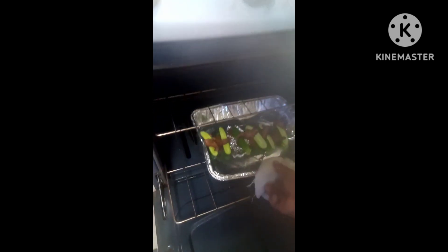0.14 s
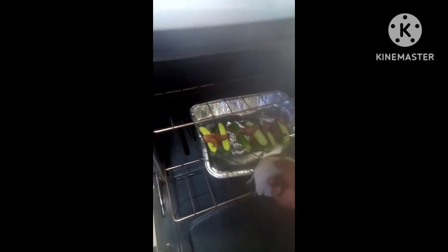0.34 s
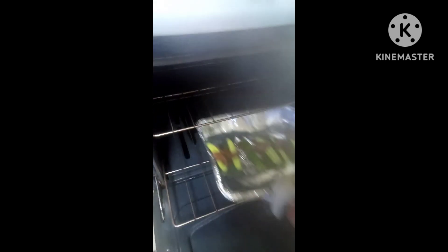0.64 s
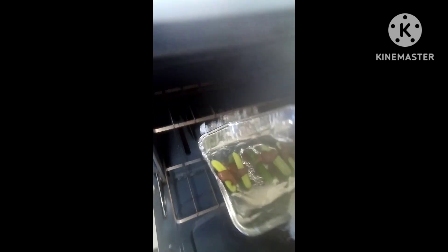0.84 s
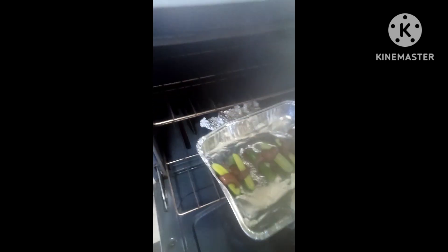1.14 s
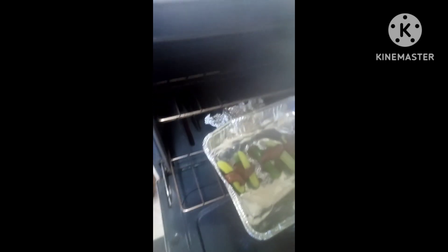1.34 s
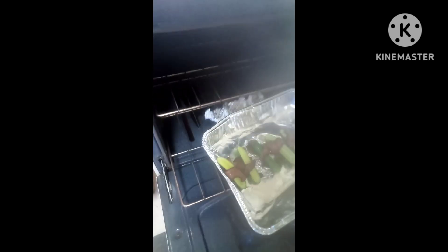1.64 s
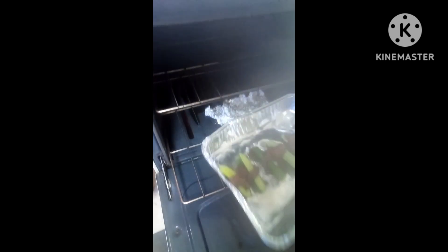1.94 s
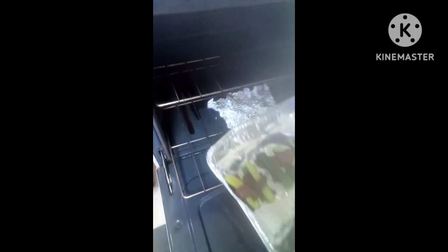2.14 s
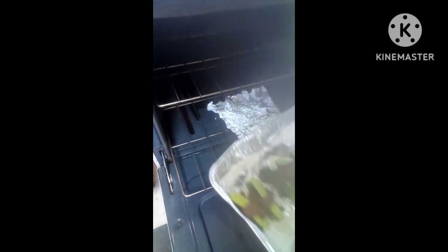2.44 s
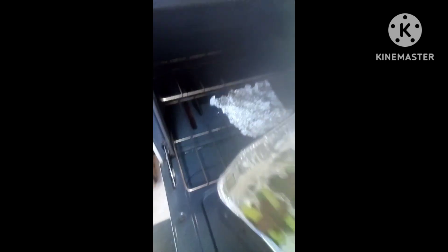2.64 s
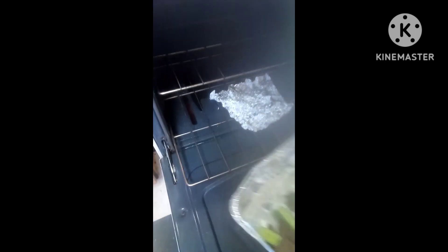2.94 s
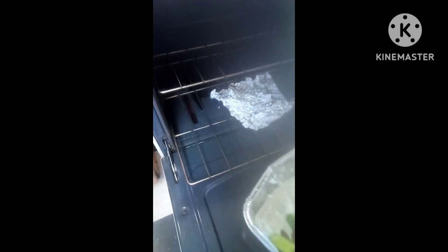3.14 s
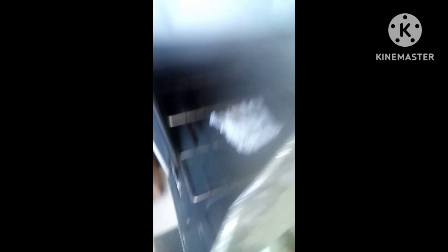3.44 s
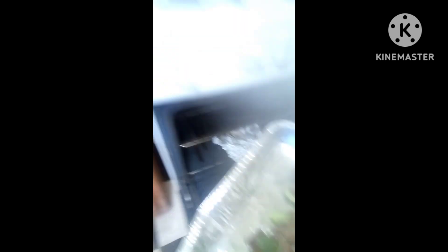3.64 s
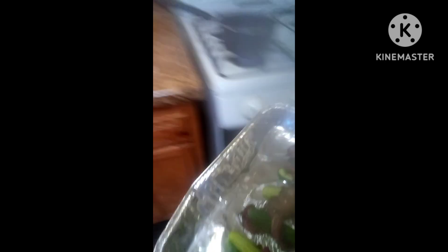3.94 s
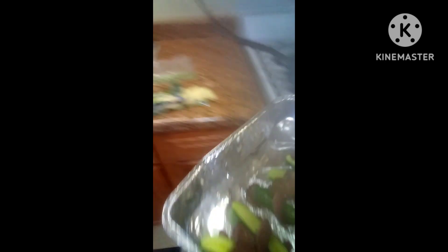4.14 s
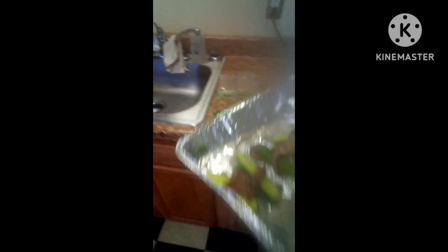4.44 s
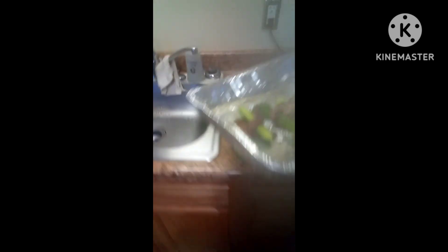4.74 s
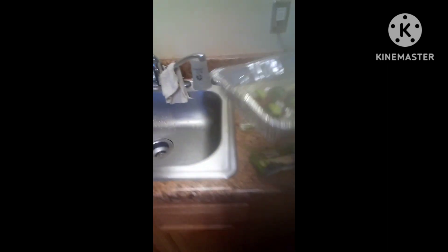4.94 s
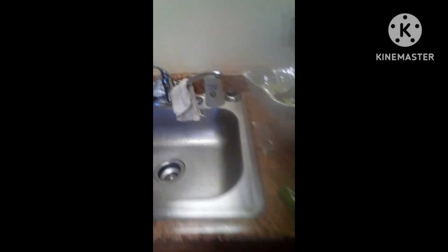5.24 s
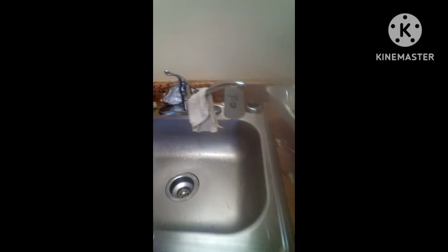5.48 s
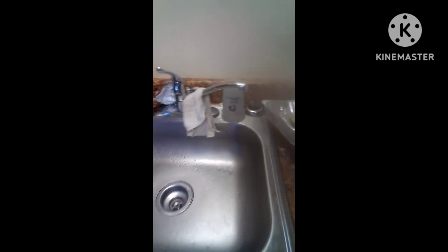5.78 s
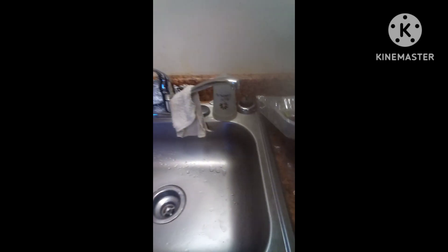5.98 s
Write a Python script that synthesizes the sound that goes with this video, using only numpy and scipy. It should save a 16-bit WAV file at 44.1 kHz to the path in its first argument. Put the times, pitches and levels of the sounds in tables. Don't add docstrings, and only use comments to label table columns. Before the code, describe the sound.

Crinkly aluminium pan dragged and lifted off a wire oven rack, popping and clanking, followed by fridge hum and a single set-down clack.

```python
import sys
import numpy as np
from scipy import signal
from scipy.fft import rfft, irfft
from scipy.io import wavfile
from scipy.ndimage import uniform_filter1d

SR = 44100
rng = np.random.default_rng(int(sys.argv[2]) if len(sys.argv) > 2 else 0)


def log_audio(samples):
    frames = np.atleast_2d(samples).T
    limited = np.clip(frames, -1, 1)
    pcm = np.round(limited * 32767).astype(np.int16)
    wavfile.write(sys.argv[1], SR, pcm)


def undo_db(level):
    steps = np.asarray(level, float) / 20
    return 10 ** steps


N = 269451

# frequency in Hz, level in dB per Hz.
FOIL = [(120, -19), (200, -21.5), (839, 2.5), (3460, 0), (3930, 2), (6230, -9), (7480, -16), (8200, -29.5),
        (9860, -34), (12100, -36.5), (13700, -47.5), (15100, -31.5), (16200, -22.5)]


def evened(x):
    return x / np.sqrt(np.mean(x ** 2) + 1e-20)


def read(points, hz):
    f, value = np.transpose(points)
    return np.interp(np.log(hz + 1), np.log(f + 1), value)


def add(mix, s, sound):
    part = mix[round(s * SR):][:len(sound)]
    part += sound[:len(part)]


def wander(span):
    noise = rng.standard_normal(N)
    return evened(uniform_filter1d(uniform_filter1d(noise, span), span))


def resonate(x, hz, width):
    turn = np.exp(2j * np.pi * np.cumsum(hz * np.ones(len(x))) / SR)
    r = np.exp(-np.pi * width / SR)
    return 2 * (turn * signal.lfilter([1 - r], [1, -r], x / turn + 1e-18)).real


def resonate_twice(x, hz, width):
    return resonate(resonate(x, hz, width), hz, width)


def colour(db_at, size=2048):
    db = np.maximum(db_at(abs(np.fft.fftfreq(size, 1 / SR))), -100)
    log_gain = db * np.log(10) / 20
    return np.fft.ifft(np.exp(np.conj(signal.hilbert(log_gain)))).real[:size // 2]


def ring(modes):
    t = np.arange(SR) / SR
    out = sum(undo_db(db - 60 * t / t60) * np.sin(2 * np.pi * hz * t) for hz, db, t60 in modes)
    return out / np.linalg.norm(out)


def room_air():
    # frequency in Hz, level in dB per Hz.
    air = [(20, -36), (48, -20), (70, -33), (100, -12), (140, -19), (200, -10), (300, -15), (900, -22),
           (2400, -34), (5500, -48.5), (8000, -70), (14000, -76), (15000, -62), (15500, -61.5)]
    level_db = -46
    frames, hz = N // 1024 + 5, np.fft.rfftfreq(4096, 1 / SR)
    a, b, chance = rng.standard_normal((frames, len(hz), 3)).T
    patches = evened(uniform_filter1d(uniform_filter1d(chance, 20, 0), 4, 1))
    swells = evened(uniform_filter1d(uniform_filter1d(patches, 150, 0), 10, 1))
    patch_db = np.interp(hz, [1500, 4500, 7000, 9000], [.8, 2.7, 2.7, .8])
    shape = undo_db(read(air, hz))
    spectra = (a + 1j * b) * shape[:, None] * undo_db(patch_db[:, None] * patches + .6 * swells)
    middle = shape[(hz > 300) & (hz < 6000)]
    share = np.sqrt((shape ** 2).sum() / (middle ** 2).sum())
    noise = signal.istft(spectra, nperseg=4096, noverlap=3072)[1][:N]
    return undo_db(level_db) * share * evened(noise)


def motor():
    # time in seconds, main line in dB, low mains line in dB.
    swells = [(0.0, -38, -53), (0.2, -38.5, -46), (0.9, -37.5, -54), (1.17, -40, -62), (1.6, -37, -60),
              (2.33, -42, -57.5), (2.98, -36, -68), (3.2, -39, -53.5), (4.14, -38.5, -55),
              (4.68, -35.5, -56), (4.9, -38, -50), (5.33, -36.5, -47.5), (5.84, -42, -52),
              (6.11, -42.5, -43.5)]
    # frequency in Hz, width in Hz, level in dB.
    drones = [(90, 11, -53.5), (120, 1.4, -65.5), (1563, 50, -64.5), (2970, 360, -63.5)]
    hum_hz, mains_hz = 239.9, 59.6
    t = np.arange(N) / SR
    s, *levels = np.transpose(swells)
    hum_db, mains_db = [np.interp(t, s, db) for db in levels]
    hum = undo_db(hum_db) * np.sin(2 * np.pi * hum_hz * t)
    mains = undo_db(mains_db) * np.sin(2 * np.pi * mains_hz * t)
    noise = rng.standard_normal(N)
    fuzz = sum(undo_db(db) * evened(resonate_twice(noise, hz, width)) for hz, width, db in drones)
    return np.sqrt(2) * (hum + mains) + fuzz


def kitchen(x):
    # frequency in Hz, t60 in seconds.
    decay = [(300, 0.9), (800, 0.48), (2100, 0.71), (5500, 0.4), (12000, 0.25)]
    taps, at = np.zeros(SR), np.arange(500, SR - 20, 10)
    taps[at + rng.integers(0, 10, len(at))] = rng.choice([-1., 1.], len(at))
    hz, t, bands = signal.stft(taps, SR, nperseg=256)
    dying = bands * undo_db(-60 * t / read(decay, hz)[:, None])
    tail = signal.istft(dying, SR, nperseg=256)[1]
    return signal.fftconvolve(x, tail / np.linalg.norm(tail))[:N]


def thuds():
    # start in seconds, level in dB, frequency in Hz, width in Hz, t60 in seconds.
    booms = [(0.6735, -28, 220, 400, 0.07), (1.4765, -27, 320, 400, 0.05), (1.87, -31, 420, 300, .04),
             (2.85, -35, 110, 110, 0.38), (2.931, -36, 140, 130, 0.3)]
    out, t = np.zeros(N), np.arange(SR // 2) / SR
    for s, db, hz, width, t60 in booms:
        push = rng.standard_normal(len(t)) + 45 * (t == 0)
        boom = evened(resonate_twice(push, hz, width))
        add(out, s, undo_db(db - 60 * t / t60) * boom * (1 - np.exp(-t / 0.0015)))
    return out


def squeals():
    # start in seconds, end in seconds, start pitch in Hz, end pitch in Hz, level
    # in dB.
    whistles = [(1.479, 1.506, 700, 680, -35), (5.848, 5.9, 810, 810, -40), (.574, .592, 830, 870, -35),
                (.716, .732, 950, 750, -31), (.783, .797, 800, 900, -35), (2.663, 2.682, 1000, 1050, -32),
                (2.764, 2.782, 800, 760, -32), (.18, .235, 930, 980, -41), (.59, .63, 5000, 5300, -43),
                (.61, .7, 2900, 3400, -43), (.68, .695, 1250, 1300, -33), (.762, .78, 5900, 5850, -37),
                (.8, .86, 950, 1050, -37), (.815, .87, 2800, 2950, -38), (.87, .95, 2950, 3100, -41)]
    out = np.zeros(N)
    for s0, s1, hz0, hz1, db in whistles:
        n = round((s1 - s0) * SR)
        glide = np.linspace(hz0, hz1, n)
        tone = resonate_twice(rng.standard_normal(SR // 4)[:n], glide, 170)
        add(out, s0, undo_db(db) * evened(tone) * signal.windows.tukey(n, .4))
    return out


def pressure():
    # time of full pressure in seconds, hold in seconds, rubbing in dB,
    # rise in seconds, grit in dB.
    strokes = [(0.0, 0, -47.5, 0.0085, -14), (0.189, 0.034, -38, 0.14, -12.5), (0.305, 0, -44.5, .02, -9),
               (0.458, 0.16, -36.5, 0.055, -8), (0.584, 0.35, -33.5, 0.045, -7.5),
               (0.98, 0.13, -38.5, 0.22, -12.5), (1.22, 0, -41, 0.24, -16), (1.282, 0.081, -37.5, .01, -27),
               (1.674, 0, -41, 0.028, -13), (1.824, 0.00051, -43.5, 0.17, -10),
               (1.898, .01, -46, 0.12, -18), (2.037, 0.082, -38.5, 0.32, -11), (2.1, .01, -37, 0.34, -7.5),
               (2.22, 0.23, -34.5, 0.4, -11), (2.567, 0, -34, 0.096, -31), (2.7, 0.036, -40, .5, -16.5),
               (2.842, 0, -37, 0.012, -17), (2.904, 0.11, -42.5, .02, -15), (3.166, 0.033, -58.5, .1, -29)]
    rise_db, let_go_db_per_s = 30, 181.5
    body_db, body_follows, grit_follows = -8, 0.3, 1.44
    t = np.arange(N // 32 + 1) * 32 / SR
    rub, body, grit = 0, 0, 0
    for s, hold, db, rise, grit_db in strokes:
        rising_db = rise_db * (t - s) / max(rise, .004)
        falling_db = let_go_db_per_s * (s + hold - t)
        under_db = np.minimum(0, np.minimum(rising_db, falling_db))
        rub = np.maximum(rub, undo_db(db + under_db))
        body = np.maximum(body, undo_db(db + body_db + body_follows * under_db))
        grit = np.maximum(grit, undo_db(db + grit_db + grit_follows * under_db))
    return [np.interp(np.arange(N) / SR, t, level) for level in (rub, body, grit)]


def drag():
    # frequency in Hz, level in dB per Hz.
    rub_colour = [(150, -15.5), (250, 6), (273, -13.5), (308, -24), (373, -12), (910, -7), (993, -5.5),
                  (1960, -12), (2880, -9.5), (6420, -17), (8350, -38), (13400, -45), (14800, -36.5),
                  (16200, -31)]
    slips_per_s, slip_spread_db = 9000, 1.5
    patches, patch_db, patch_swing_db = 9, -11, 4.5
    rub, weight, grit = pressure()
    size_db = slip_spread_db * np.minimum(rng.exponential(1, N), 3)
    slips = undo_db(size_db) * rng.standard_normal(N) * (rng.random(N) < slips_per_s / SR)
    slips = evened(slips * undo_db(1.2 * wander(300)))
    pitches = np.geomspace(600, 6500, patches) * rng.uniform(0.838, 1.19, patches)
    bend = 1 + .06 * wander(3000)
    rings = 0
    for hz in pitches:
        struck = slips * undo_db(patch_swing_db * wander(1200))
        rings = rings + resonate(struck, hz * bend, 140) * np.sqrt(hz)
    rubbed = slips + undo_db(patch_db) * evened(rings)
    coloured = signal.oaconvolve(rubbed, colour(lambda f: read(rub_colour, f)))[:N]
    spectrum, hz = rfft(coloured), np.fft.rfftfreq(N, 1 / SR)
    low = 1 / (1 + (hz / 1200) ** 4)
    high = 1 / (1 + (7800 / (hz + 1)) ** 16)
    body, rasp, fizz = (evened(irfft(spectrum * part, N)) for part in (low, 1 - low - high, high))
    return rub * rasp + weight * body + grit * fizz


def snap(foil, lumpy_db, first_db, db, body_db, bright_db, air_db, rattle_ms):
    ms = np.arange(2600) / SR * 1000
    shape = undo_db(-.6 * ms - 2.0 * np.maximum(ms - rattle_ms, 0)) + undo_db(-15.0 - 0.3 * ms)
    clicks = rng.standard_normal(len(ms)) * undo_db(2.0 * np.minimum(rng.exponential(1, len(ms)), 3))
    rattle = signal.lfilter([1, .6], [1.6], shape * clicks)
    rattle += undo_db(-24 - 3.1 * ms) * clicks
    rattle += undo_db(first_db) * (ms == 0)
    lumps = list(zip(np.geomspace(300, 16000, 40), lumpy_db * rng.standard_normal(40)))
    blow = [(350, 1.12 * (body_db + 14)), (700, body_db + 15), (1800, 0.007),
            (5500, bright_db + 5.0), (7000, bright_db + 7.5),
            (8500, air_db + 34.5), (15000, 0.95 * (air_db + 38.0))]
    tone = colour(lambda f: read(foil, f) + read(blow, f) + read(lumps, f), size=1024)
    pop = np.convolve(rattle, tone)
    return undo_db(db - 9.5) * pop / np.sqrt(uniform_filter1d(pop ** 2, 300).max())


def snaps(rows, top_db, foil, lumpy_db=2.5, first_db=19):
    out = np.zeros(N)
    for s, db, body_db, bright_db, rattle_ms in rows:
        pop = snap(foil, lumpy_db, first_db, db, body_db, bright_db, bright_db + top_db, rattle_ms)
        add(out, s + .0007, pop)
    return out


def creaks():
    # start in seconds, peak in dB, body in dB, brightness in dB, rattle length in ms.
    flexes = [
        (3.1577, -40, -13, -8, 2.6),
        (3.1971, -42.5, -20, -0.5, 3),
        (3.3295, -52, -17.5, 1, 3.8),
        (3.3628, -41, -15, -9, 3.9),
        (5.631, -40, -12.5, -12.5, 3.4),
    ]
    return snaps(flexes, -18.5, FOIL)


def buckles():
    # start in seconds, peak in dB, body in
    # dB, brightness in dB, rattle length in ms.
    folds = [(0.149, -34.5, -11.5, -3, 15), (0.308, -42, -1, -24, 8), (0.435, -33, -38, 1, 8),
             (0.459, -21.5, -2, 4, 20), (0.575, -18, -10, -8, 5.7), (0.649, -32, 0, -18, 6),
             (0.707, -21, -6, -4, 7.3), (0.716, -13, -14, -2.5, 42), (0.783, -17, -5, -10, 14),
             (0.849, -18.5, -13, -9, 5.2), (0.897, -9.5, -11, -2.5, 4.6), (0.962, -25, 0.5, -26, 2.7),
             (1.671, -30, -12, -4, 15), (1.695, -29, -6, -26, 8), (1.784, -31, -8, -13, 8.7),
             (1.87, -19.5, -1.5, -12, 11),
             (1.943, -10.5, -17, -2.5, 6.2), (2.094, -20, -2, -16, 30), (2.153, -23, 4.5, -16, 6.4),
            (2.264, -14.5, -16.5, -6, 17), (2.307, -7, -12.5, 0.5, 7), (2.37, -8.5, -14.5, -6.5, 11),
            (2.4, -12.5, -10.5, -17, 11), (2.481, -17.5, -7, -17, 17), (2.524, -8.5, -17, -7.5, 17),
            (2.553, -9.5, -9, -10, 18), (2.66, -15, -22, -40, 12), (2.856, -11, -15, -22.5, 9.1),
            (2.909, -26.5, -33, -18, 12), (2.98, -33, -31, -16, 5.1)]
    return snaps(folds, -20.5, FOIL)


def knocks():
    # start in seconds, peak in dB, body in dB, brightness in dB, rattle length in ms.
    hits = [(1.304, -9, -31, -7.5, 9.2), (1.333, -13, -11, -6, 3.5), (1.477, -19.5, -1.5, -18, 16),
            (1.549, -33, -18, -6, 23), (1.917, -9, -22.5, -13, 8), (2.175, -15.5, -23, -13, 7.8),
            (2.193, -10.5, -5.5, -4, 10), (2.231, -7, -13.5, -11.5, 11), (2.6, -12.5, -9, -7, 9),
            (2.618, -9.5, -15.5, -14, 4.7), (2.624, -15.5, -11, -2.5, 5.1), (2.739, -11.5, -9, -12, 9.6),
            (2.765, -14.5, 0, -12, 4.1)]
    return snaps(hits, -27.5, FOIL)


def cracks():
    # start in seconds, peak in dB, body in dB, brightness in dB, rattle length in ms.
    hits = [
        (0.674, -11, -6, -33, 5),
        (1.262, -24.5, -1.5, -15.5, 3),
        (1.004, -6, -16.5, -1.5, 6.5),
        (1.032, -8, -15, -6, 7.1),
        (1.279, -8, -11.5, 1, 8.8),
        (1.514, -20.5, -9.5, -15, 14),
        (2.846, -16.5, -9, -25, 2.9),
    ]
    return snaps(hits, -17, FOIL, first_db=20)


def rack_wires(on_rack):
    # frequency in Hz, level in dB, t60 in seconds.
    wires = [(587, -4, .7), (681, -4, .5), (689, -1, .9), (808, -2, .35), (822, -3, .35), (955, -3, .35),
             (986, -3, .35), (1222, -5, .25), (1400, -7, .2), (1652, -6, .25), (2035, -11, .2),
             (2850, -13, .3)]
    return undo_db(-23) * signal.fftconvolve(on_rack, ring(wires))[:N]


def set_down():
    # start in seconds, peak in dB, body in dB, brightness in dB, rattle length in ms.
    landing = [
        (5.842, -12.5, -14.5, 0.9, 8),
    ]
    # frequency in Hz, level in dB per Hz.
    clack = [(300, -24), (650, -22), (900, -5.5), (1250, -1.5), (1700, 0.5), (2300, -6.5), (3000, -8),
             (3900, -9), (6000, -19), (9000, -53.5), (15000, -73)]
    return snaps(landing, -22, clack, lumpy_db=0, first_db=28)


def counter_and_rim(down):
    # frequency in Hz, level in dB, t60 in seconds.
    counter = [(830, -2, .15), (1210, -3, .05), (1620, -6, .15), (2280, 0, .04), (2810, -4, .2),
               (2850, -5, .2), (3800, -2, .04)]
    # frequency in Hz, level in dB, t60 in seconds.
    rim = [(820, -9, .025), (1220, 0, .025), (1600, -5, .025), (2290, 0, .025), (2820, -8, .025),
           (3800, -2, .025), (5400, -6, .02)]
    top_ring = undo_db(-16) * signal.fftconvolve(down, ring(counter))[:N]
    rim_ring = undo_db(-4) * signal.fftconvolve(down, ring(rim))[:N]
    return top_ring + rim_ring


def scene():
    on_rack = drag() + buckles() + knocks() + cracks()
    close = on_rack + squeals() + rack_wires(on_rack) + creaks() + thuds()
    down = set_down()
    wet = kitchen(undo_db(-11.5) * close + undo_db(-2) * down)
    landed = undo_db(0.5) * down + counter_and_rim(down)
    return (close + landed + wet + room_air() + motor())[None]


def top_cut(x):
    return signal.sosfilt(signal.butter(12, 16820, fs=SR, output="sos"), x)


def record(dry):
    lowpass = signal.firwin(511, 15750, window=("kaiser", 7), fs=SR)
    limited = signal.oaconvolve(dry, lowpass[None], "same")
    return top_cut(limited)


dry = scene()
out = record(dry)
log_audio(out)
```